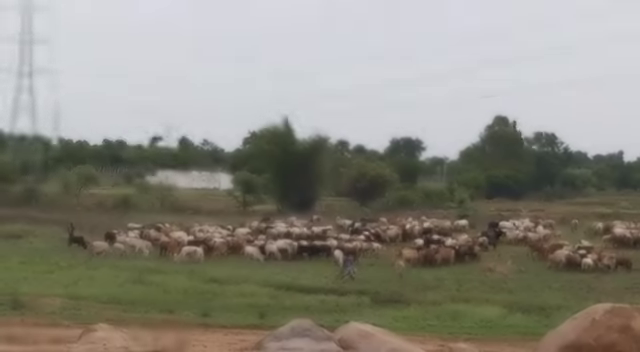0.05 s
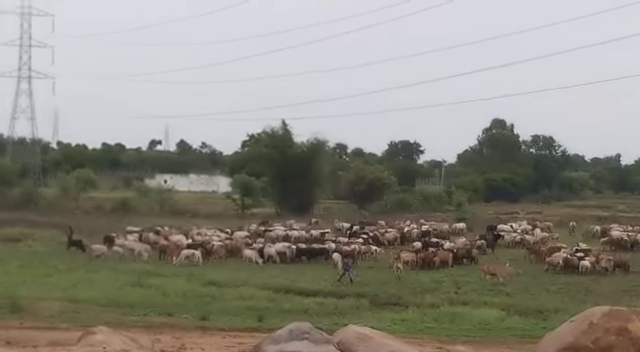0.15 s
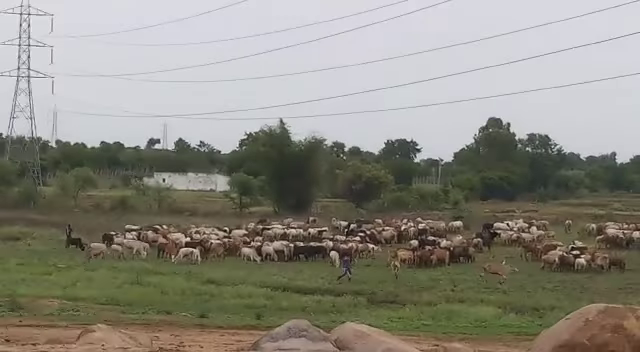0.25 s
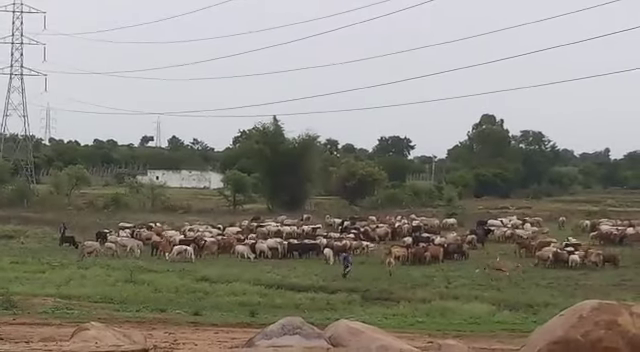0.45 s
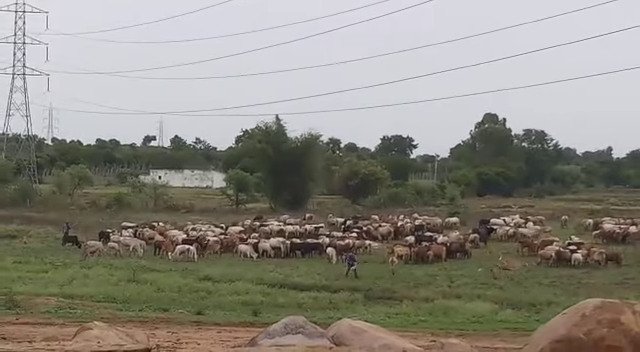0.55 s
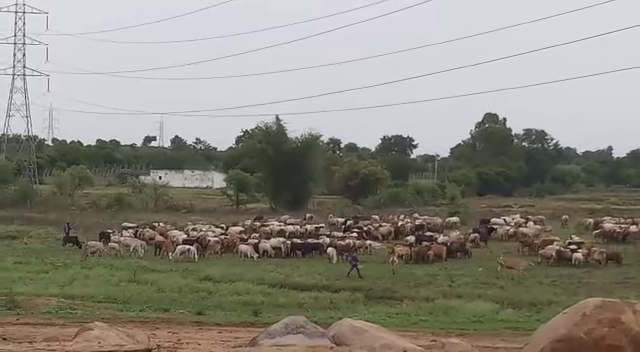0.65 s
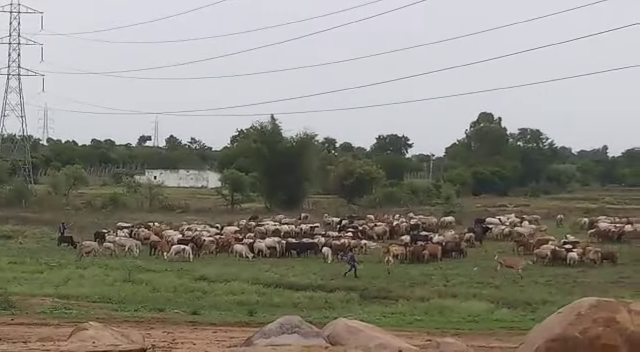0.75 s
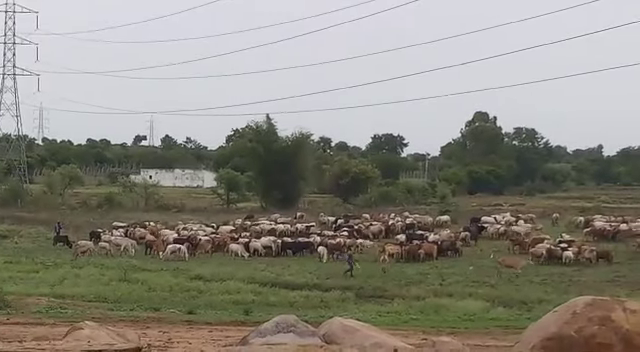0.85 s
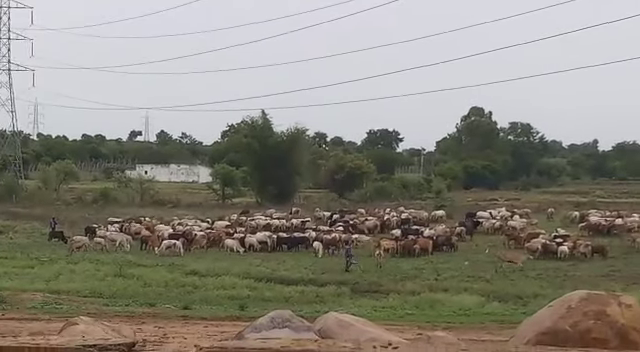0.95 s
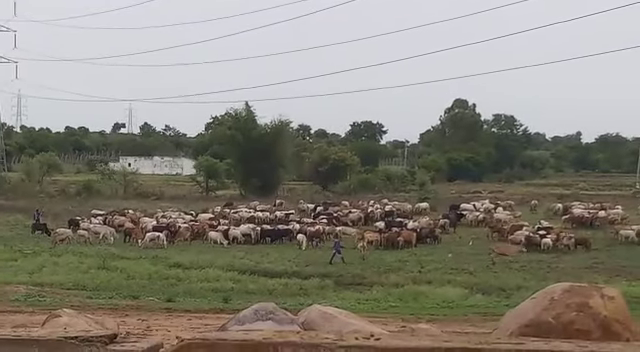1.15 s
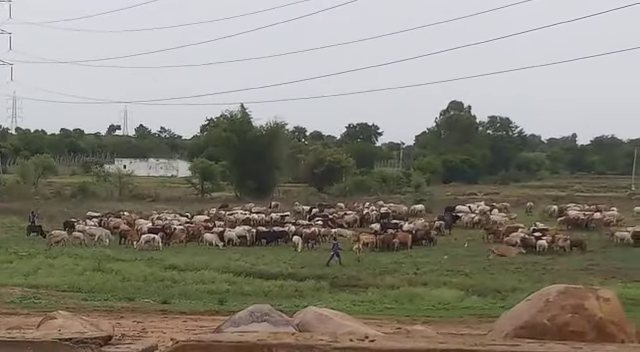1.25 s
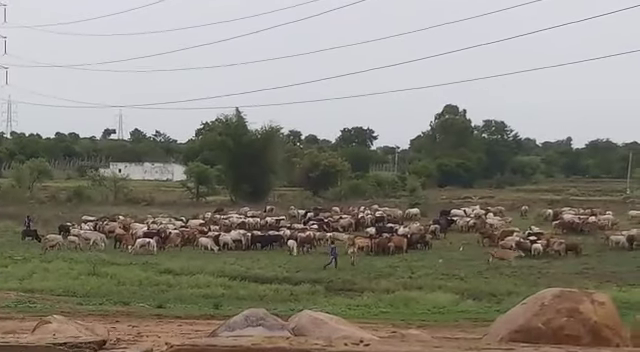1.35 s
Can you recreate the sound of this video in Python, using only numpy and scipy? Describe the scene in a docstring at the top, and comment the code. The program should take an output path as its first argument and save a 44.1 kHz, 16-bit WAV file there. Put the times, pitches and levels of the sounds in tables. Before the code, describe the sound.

Close microphone handling noise starts abruptly with grainy rubbing, low pops and short crackling bursts. A weaker flurry follows and fades to a few soft ticks, with only faint outdoor air of a quiet field behind it.

```python
"""Fingers rub and slip on a hand-held camera, close to its microphone opening.
Each slip is a sudden step in pressure, which the microphone's bass cut turns into a dull pop.
Hard slips chatter in short crackling bursts, and small sharp ticks dot the rubbing.
Behind it all is the faint air of a quiet open field."""
import sys
import numpy as np
from scipy import signal
from scipy.io import wavfile

SR = 44100
rng = np.random.default_rng(int(sys.argv[2]) if len(sys.argv) > 2 else 0)


def file_out(sig):
    """Save sig as 16-bit WAV at sys.argv[1]."""
    # one column per channel
    cols = np.atleast_2d(sig).T
    # limit, then scale
    lim = np.clip(cols, -1, 1)
    pcm = np.round(lim * 32767).astype(np.int16)
    wavfile.write(sys.argv[1], SR, pcm)


N = 61739
BASS_CUT_HZ = 97.5  # the microphone weakens sound below this


def amp(db):
    """Turns decibels into a number to multiply by."""
    return 10 ** (np.asarray(db) / 20)


def unit(x):
    """Scales a sound to an average strength (rms) of 1."""
    return x / np.sqrt(np.mean(x ** 2) + 1e-20)


def add(mix, start_s, sound):
    """Adds a sound to the mix at the given time."""
    part = mix[max(round(start_s * SR), 0):][:len(sound)]
    part += sound[:len(part)]


def butter(x, hz, kind, order):
    """Keeps the "low" or the "high" side of hz; a higher order cuts more steeply."""
    return signal.sosfilt(signal.butter(order, min(hz, .45 * SR), kind, fs=SR, output="sos"), x)


def colour(x, points):
    """Shapes the tone along (Hz, dB) points while keeping the start of each click sharp."""
    point_hz, db = np.transpose(points)
    hz = abs(np.fft.fftfreq(4096, 1 / SR))
    log_gain = np.log(amp(np.interp(np.log(hz + 1), np.log(point_hz), db)))
    spectrum = np.exp(np.conj(signal.hilbert(log_gain)))  # rings after a click, never before it
    response = np.fft.ifft(spectrum).real
    return signal.fftconvolve(x, response[:len(hz) // 2])[:N]


def grains(per_s, spread_db):
    """Tiny pushes and pulls of uneven size at random moments."""
    size = amp(spread_db * np.minimum(rng.exponential(1, N), 4))
    return size * rng.choice([-1., 1.], N) * (rng.random(N) < per_s / SR)


def air():
    """A faint, dull outdoor background that fades in."""
    # The tone of the open air. Each row: frequency in Hz, relative level in dB.
    air_tone = [(25, -9), (80, 1.5), (200, -8), (600, -15.5), (2000, -21), (5000, -25), (9000, -32),
                (15500, -35.5)]
    level_db, fade_s = -51, 0.1
    fade_in = np.minimum(np.arange(N) / SR / fade_s, 1) ** 2
    return amp(level_db) * unit(colour(rng.standard_normal(N), air_tone)) * fade_in


def ticks():
    """The skin catches and makes very short spikes of pressure."""
    # Catches of the skin. Each row: start in seconds, peak level in dB.
    catches = [(0.137, -26.5), (.2113, -7.5), (.2125, -11), (.2652, -11), (.2931, -4), (.2961, -10),
               (0.3274, -18.5), (0.4079, -5), (0.4098, -14), (0.438, -14), (0.464, -35), (.4826, -12.5),
               (0.5068, -7), (0.709, -32), (.7345, -24), (.775, -27.5), (.830, -20.5), (0.875, -23),
               (.9336, -21), (.9555, -21), (0.9618, -15), (0.9671, -12), (0.9696, -14.5), (0.9799, -17),
               (1.002, -31), (1.0134, -25), (1.095, -27), (1.1005, -25), (1.11, -29), (1.2615, -33)]
    rise_s = .00005
    age = np.arange(0, 20, 1 / (SR * rise_s))  # counted in rise times
    spikes = np.zeros(N)
    for start, db in catches:
        add(spikes, start, amp(db) * age * np.exp(1 - age))
    return butter(spikes, BASS_CUT_HZ, "high", order=2)


def chatter():
    """In a hard slip the contact flips back and forth at uneven intervals and crackles."""
    # Hard slips. Each row: start in seconds, length in seconds, level in dB, rough flips per second.
    bursts = [(0.2089, 0.0044, -14.5, 6500), (0.2181, 0.0046, -7.5, 5400), (0.2956, .0007, -10, 8000),
              (0.4117, 0.00096, -14, 8200), (0.509, 0.0011, -18, 5500), (.6488, .0038, -10.5, 6460),
              (0.655, 0.0016, -14.5, 4000)]
    # The tone of the crackle. Each row: frequency in Hz, boost or cut in dB.
    crackle_tone = [(100, -6), (350, -0.5), (800, -0.5), (1600, -3), (3500, 1.5), (6500, 2), (10000, -5.5),
                    (15500, -4)]
    jitter, spread_db = .8, 0.5
    crackle = np.zeros(N)
    for start, length, db, per_s in bursts:
        gaps, sizes = rng.standard_normal(size=(2, 64))
        flip_times = np.cumsum(np.exp(jitter * gaps)) / per_s
        flips_so_far = np.searchsorted(flip_times[:-1], np.arange(0, length, 1 / SR))
        back_and_forth = (-1.) ** flips_so_far * amp(spread_db * sizes[flips_so_far])
        add(crackle, start, amp(db) * unit(back_and_forth))
    return butter(colour(crackle, crackle_tone), BASS_CUT_HZ, "high", order=2)


def rub_strength():
    """How hard the fingers rub at each moment: an unbroken drag plus scuffs that swell and fade."""
    # The drag of the fingers. Each row: time in seconds, level in dB.
    drag = [(0, -66.5), (.062, -68.5), (0.07, -55.5), (0.207, -45.5), (0.213, -18.5), (.224, -22.5),
            (0.245, -29), (.258, -25), (.282, -27.5), (.295, -30.5), (0.309, -34), (.385, -38.5),
            (0.416, -29.5), (.475, -32), (0.502, -36), (.515, -25.5), (.562, -36), (.577, -49),
            (.613, -48.5), (0.622, -27), (0.647, -32), (0.663, -43), (0.791, -48), (0.867, -46.5),
            (0.896, -37), (0.924, -45), (0.935, -30.5), (0.974, -38), (0.986, -50), (1.10, -49.5),
            (1.23, -47), (1.29, -58), (1.39, -53.5)]
    # Brief, light scuffs. Each row: start in seconds, length in seconds, peak level in dB.
    scuffs = [(.021, 0.008, -47), (0.034, 0.011, -45.5), (0.074, 0.019, -51.5), (0.14, 0.0049, -50),
              (0.692, 0.01, -44), (0.724, 0.015, -42), (0.753, .008, -43), (0.804, 0.009, -41.5),
              (.815, 0.025, -38), (1.040, 0.017, -44), (1.083, 0.032, -46), (1.143, 0.0075, -36),
              (1.258, 0.009, -40), (1.370, 0.014, -48)]
    strength = amp(np.interp(np.arange(N) / SR, *np.transpose(drag)))
    for start, length, db in scuffs:
        progress = np.arange(0, length, 1 / SR) / length
        add(strength, start, amp(db) * np.sin(np.pi * np.sqrt(progress)))
    return strength


def rubbing():
    """Skin on the case makes a grainy hiss; the grip flutters, and a light touch sounds duller."""
    # The tone that the case gives the rubbing. Each row: frequency in Hz, relative level in dB.
    case_tone = [(30, -15.5), (90, 2), (250, 0.5), (600, -4.5), (1300, -10.5), (3500, -13), (6500, -19.5),
                 (10000, -26), (15500, -30)]
    flutter_db, flutter_s, light_touch_db = 2.3, 0.0051, -45.5
    friction = unit(grains(per_s=3500, spread_db=4)) + 0.49 * rng.standard_normal(N)
    bright = unit(colour(friction, case_tone))
    dull = butter(bright, hz=4500, kind="low", order=1)
    smoothing = np.hanning(round(2 * flutter_s * SR))
    flutter = unit(signal.fftconvolve(rng.standard_normal(N), smoothing, "same"))
    strength = rub_strength()
    firmness = strength / (strength + amp(light_touch_db))  # near 0 when light, near 1 when firm
    return strength * amp(flutter_db * flutter) * (firmness * bright + (1 - firmness) * dull)


def pops():
    """Each slip steps the pressure; the bass cut pulls it back within milliseconds, leaving a pop."""
    # Single slips. Each row: time in seconds, step size in dB, direction (1 push, -1 release).
    single_slips = [(0.075, -32, 1), (0.2145, -4.5, -1), (0.2155, -5, 1), (.2170, -7, -1),
                    (0.2213, -11, -1), (0.2301, -10.5, 1), (0.234, -9, -1), (0.2516, -15, 1),
                    (.2528, 0, -1), (0.2566, -10.5, 1), (0.2581, -7.5, 1), (.2670, -19, -1),
                    (.2878, -13, -1), (.2929, -1, -1), (0.2941, -10.5, 1), (0.4073, -8, 1),
                    (.4087, -4.5, -1), (0.4124, -8.5, 1), (.4131, -10, -1), (0.446, -13.5, -1),
                    (0.4537, -11.5, -1), (0.4639, -15, -1), (.4853, -10, -1), (0.489, -11, -1),
                    (0.5096, -14, 1), (0.5117, -3, -1), (0.5695, -8, 1), (0.6175, -12.5, -1),
                    (.6488, -5.5, 1), (0.6535, -6.5, -1), (0.6543, -4.5, 1), (0.6558, -7, -1),
                    (.6561, -4, 1), (.7590, -27, 1), (0.8834, -18.5, -1), (.9337, -9, 1),
                    (0.9343, -12.5, -1), (0.9414, -14, 1), (0.9449, -8.5, -1), (0.9571, -21, 1),
                    (0.9585, -16.5, -1), (0.9746, -16, 1), (0.9766, -15.5, -1), (0.9812, -18, 1),
                    (1.0154, -22.5, -1), (1.1160, -27, -1), (1.1475, -33.5, 1), (1.2619, -30.5, 1)]
    creep_db = -4.5  # small random slips that grow with the rubbing
    slips = amp(creep_db) * rub_strength() * grains(per_s=160, spread_db=4.5)
    for start, db, direction in single_slips:
        add(slips, start, np.array([np.sign(direction) * amp(db)]))
    pressure = butter(np.cumsum(slips), hz=5800, kind="low", order=1)  # steps with rounded edges
    return butter(pressure, BASS_CUT_HZ, "high", order=2)


def scene():
    """The finger noises and the open air, mixed into one channel."""
    return (pops() + chatter() + ticks() + rubbing() + air())[None]


def record(dry):
    """Flattens any peak that is too loud, then removes the highest treble."""
    clipped = np.clip(dry, -.92, .92)
    cutoff_hz = 16000
    treble_cut = signal.firwin(161, cutoff_hz, window=("kaiser", 8), fs=SR)
    return signal.oaconvolve(clipped, treble_cut[None], "same")


dry = scene()
out = record(dry)
file_out(out)
```